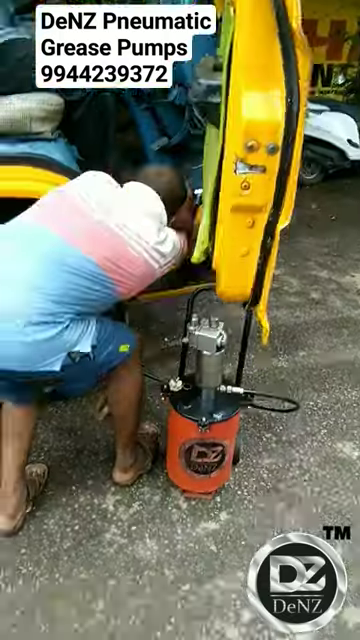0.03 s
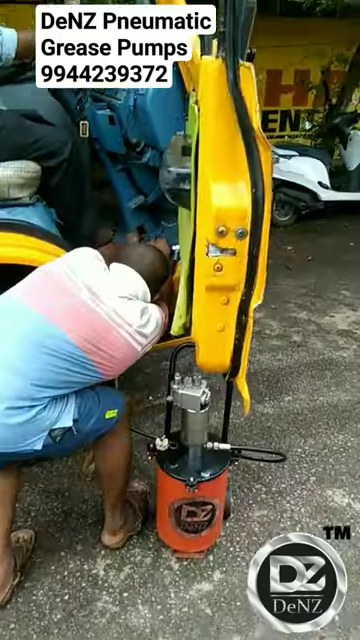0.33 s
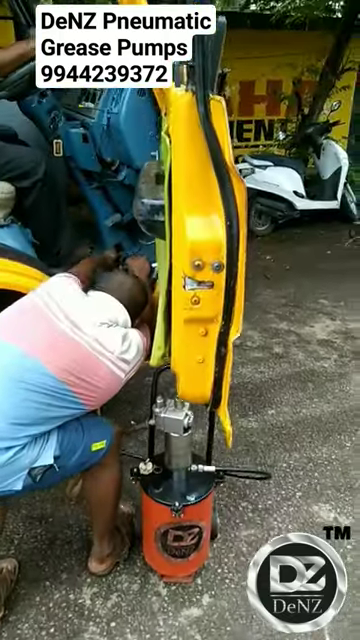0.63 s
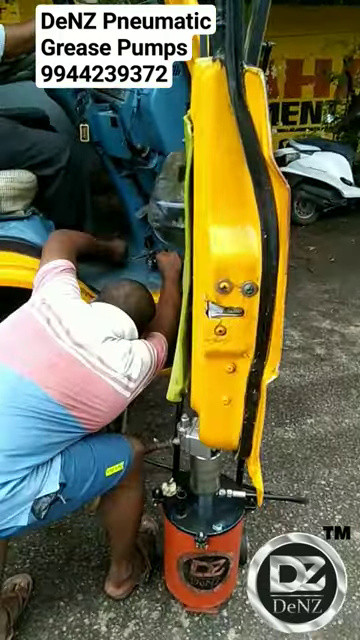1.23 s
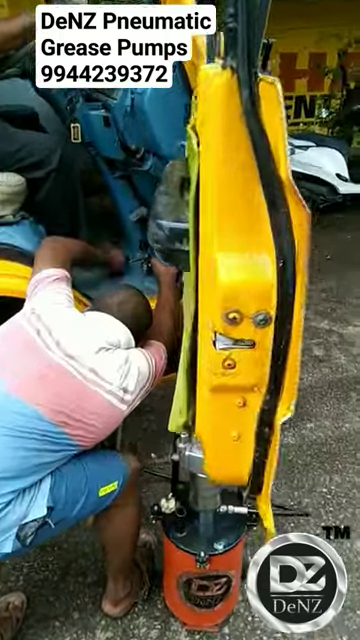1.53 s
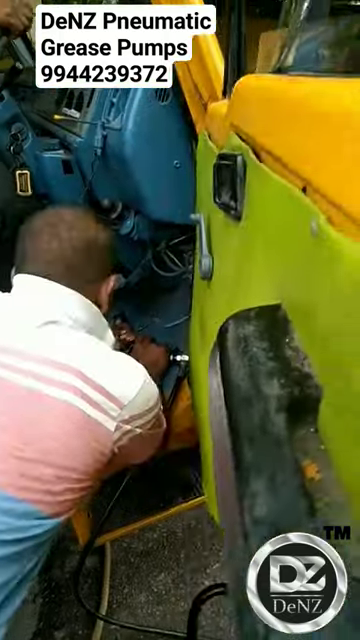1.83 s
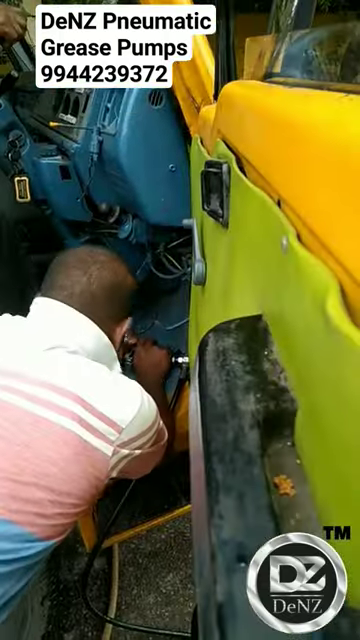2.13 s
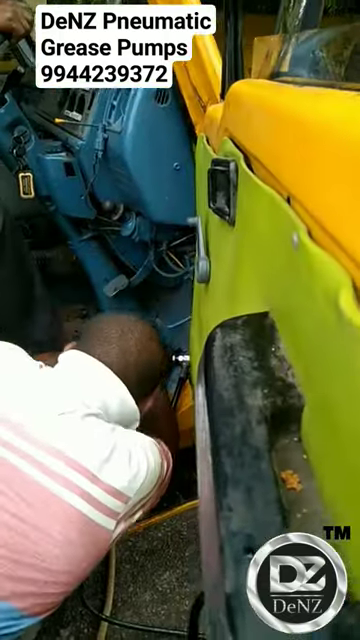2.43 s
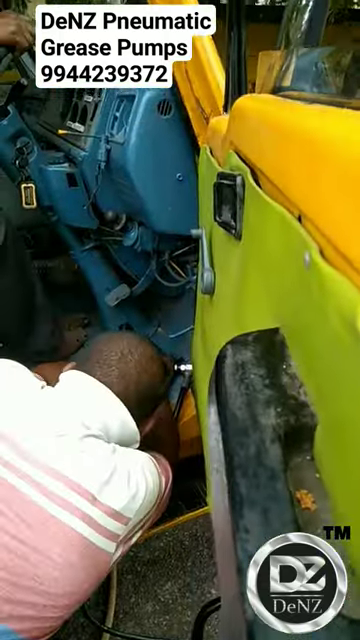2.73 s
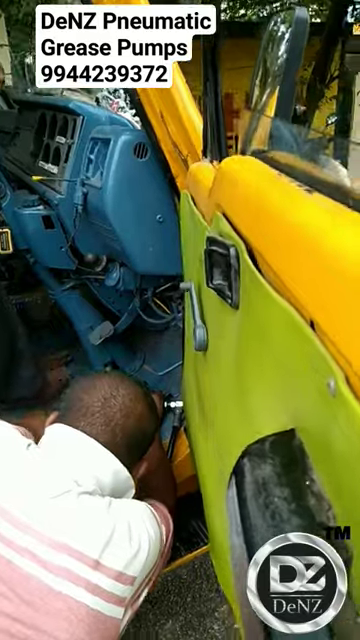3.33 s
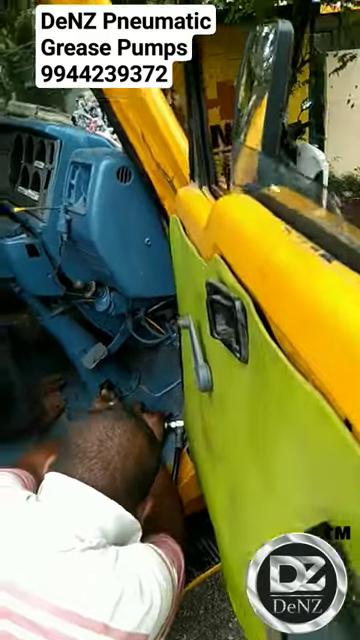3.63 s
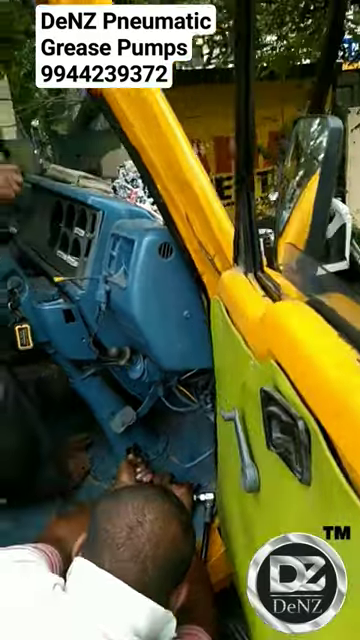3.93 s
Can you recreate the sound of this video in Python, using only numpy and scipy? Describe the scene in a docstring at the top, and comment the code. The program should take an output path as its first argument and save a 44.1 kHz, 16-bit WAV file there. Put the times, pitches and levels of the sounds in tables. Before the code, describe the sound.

An air-driven grease pump hisses in repeated whistling bursts after a low traffic rumble.

```python
"""An air-driven grease pump works beside a truck on a road. Each cycle dumps air through the
exhaust, which hisses and whistles; the whistles sink as the pressure runs out. The piston knocks
softly at each end of its travel, and the sound echoes off door and road.
Before the pump starts at 1.75 s, traffic rumbles with a thin whine, two clicks and a short
rustle are heard, and the sound drops out twice."""
import sys
import numpy as np
from scipy import signal
from scipy.fft import rfft, irfft
from scipy.io import wavfile

SR = 44100
rng = np.random.default_rng(int(sys.argv[2]) if len(sys.argv) > 2 else 0)


def generate_wav(sig):
    """Save sig (samples, or channels by samples) to the path in sys.argv[1] as 16-bit PCM at SR."""
    pcm = np.round(np.clip(np.atleast_2d(sig).T, -1, 1) * 32767).astype(np.int16)
    wavfile.write(sys.argv[1], SR, pcm)


N = 176400
T = np.arange(N) / SR


def amp(db):
    """Turns decibels into a gain."""
    return 10 ** (np.asarray(db) / 20)


def unit(x):
    """Scales a signal to an average (rms) size of 1."""
    return x / np.sqrt(np.mean(x ** 2) + 1e-20)


def noise(points):
    """Noise shaped by rows of pitch in Hz and relative level in dB."""
    hz, db = np.transpose(points)
    shape = np.interp(np.log(np.fft.rfftfreq(N, 1 / SR) + 1), np.log(hz), db)
    return unit(irfft(rfft(rng.standard_normal(N)) * amp(shape), N))


def wander(hz):
    """A random wobble, mostly slower than hz."""
    keep_slow = 1 / (1 + (np.fft.rfftfreq(N, 1 / SR) / hz) ** 4)
    return unit(irfft(rfft(rng.standard_normal(N)) * keep_slow, N))


def whistle(hz, width_hz):
    """A breathy tone: a narrow band of noise around a pitch that may move."""
    r = np.exp(-np.pi * width_hz / SR)
    white = rng.standard_normal(N) + 1j * rng.standard_normal(N)
    slow = signal.lfilter([1], [1, -2 * r, r * r], white)
    phase = 2 * np.pi * np.cumsum(hz * np.ones(N)) / SR
    return unit((slow * np.exp(1j * phase)).real)


def level(points):
    """A gain that follows rows of time in seconds and level in dB."""
    return amp(np.interp(T, *np.transpose(points)))


TOP_HZ, WHISTLE_WIDTH_HZ = 15460, 680  # the high whistle: pitch at full pressure, and width
# Pump cycles. Each row: start in seconds, opening time in seconds, hiss, fizz and port ring levels
# in relative dB, ring pitch in Hz, the low whistle's starting pitch in Hz and level in dB, time in
# seconds when the pressure starts to run out, fall of the high whistle in Hz per second.
CYCLES = [(1.754, 0.0077, -0.5, 0.5, -32, 4960, 6030, -48, 1.827, 32000),
          (1.972, 0.0021, -0.5, 0.5, -27.5, 4990, 6300, -27.5, 2.24, 57600),
          (2.343, 0.0056, -1, -1, -26, 4930, 6230, -29, 2.555, 41100),
          (2.712, .005, 0, -1, -26.5, 4930, 6140, -30, 2.935, 71700),
          (3.185, 0.0037, 0, 1.5, -32, 4890, 7070, -21.5, 3.413, 57100),
          (3.759, 0.018, 1, 3, -26, 4750, 6830, -21, 3.994, 50000)]


def exhaust():
    """Each cycle lets out a jet of air, which slows and fades as the pressure runs out."""
    rows = np.array(CYCLES)
    now = np.maximum(np.searchsorted(rows[:, 0], T) - 1, 0)
    start, opening, hiss_db, fizz_db, ring_db, ring_hz, low_hz, low_db, runs_out, fall = rows[now].T
    age = np.maximum(T - start, 0)
    valve = np.clip(age / opening, 0, 1)
    falling_s = 0.02 * np.logaddexp(0, (T - runs_out) / 0.02)  # eases into the fall
    high_hz = np.maximum(TOP_HZ - fall * falling_s, 1)
    speed = high_hz / TOP_HZ
    closing = 1 / (1 + (3270 / high_hz) ** 4)  # the hiss shuts off as the whistle sinks past 3270 Hz
    flow = closing * amp(-10 * age + 0.74 * wander(hz=60))  # sags and flutters
    rush = rushing_air(speed, hiss_db, fizz_db, ring_db, ring_hz)
    high = high_whistle(high_hz)
    low = amp(low_db - 41 * age) * speed ** 2 * whistle(low_hz - 7500 * age, width_hz=850)
    return valve * (flow * rush + high + low)


# The jet's hiss and its brighter fizz. Each row: pitch in Hz, relative level in dB.
HISS = [(300, -26), (1000, -25), (1800, -19.5), (2500, -11.5), (3100, -9.5), (3600, -2.5), (4500, 0.5),
        (5200, 0), (5900, -6), (7000, -9.5), (9000, -14.5), (16000, -33)]
FIZZ = [(3000, -32.5), (7000, -11.5), (8500, -6.5), (9700, -5), (10500, -1.5), (11900, 2), (12800, -4.5),
        (14000, -15.5), (15500, -16.5)]
# Weaker rings of the exhaust port. Each row: pitch in Hz, width in Hz, level in dB at full flow.
PORT_RINGS = [(3623, 160, -39.5), (4004, 110, -41.5), (4270, 160, -36), (5260, 84, -36)]


def rushing_air(speed, hiss_db, fizz_db, ring_db, ring_hz):
    """The jet hisses and makes the port ring; as it slows, the fizz fades first."""
    port = amp(ring_db) * whistle(ring_hz, width_hz=180)
    port += sum(amp(db) * whistle(hz, width) for hz, width, db in PORT_RINGS)
    hiss = amp(hiss_db - 22) * noise(HISS)
    fizz = amp(fizz_db - 27.5) * noise(FIZZ)
    return (hiss + port) * speed ** 0.81 + fizz * speed ** 1.4


def high_whistle(hz):
    """Starts faint, grows as it sinks, sputters, and stalls when the jet gets too slow."""
    loudest_hz, stall_hz, sputter_hz = 11500, 4160, 70.2
    faint = np.clip((hz - loudest_hz) / (TOP_HZ - loudest_hz), 0, 1)
    strength = np.minimum(hz / loudest_hz, 1) ** 0.96 / (1 + (stall_hz / hz) ** 10)
    sputter = amp(-28.5 - 18.5 * faint ** 2 + 3 * wander(sputter_hz))
    shaky_hz = hz * (1 + 0.014 * wander(sputter_hz))
    return strength * sputter * whistle(shaky_hz, WHISTLE_WIDTH_HZ)


# Air chirps. Each row: middle in seconds, pitch there in Hz, level in dB.
CHIRPS = [(2.865, 14500, -38), (3.36, 12700, -34), (3.974, 12020, -27)]


def chirps(swell_s=0.029, fall_hz_per_s=45000):
    """The jet briefly whistles downward before the piston turns."""
    out = np.zeros(N)
    for middle, hz, db in CHIRPS:
        since = np.clip(T - middle, -5 * swell_s, 5 * swell_s)
        swell = amp(db) * np.exp(-(since / swell_s) ** 2)
        out += swell * whistle(hz - fall_hz_per_s * since, WHISTLE_WIDTH_HZ)
    return out


# Piston knocks. Each row: start in seconds, relative level in dB.
KNOCKS = [(1.972, -31), (2.146, -30.5), (2.342, -34), (2.512, -30), (2.709, -33), (2.878, -31),
          (3.186, -30.5), (3.377, -31), (3.774, -29.5), (3.976, -34.5)]


def knocks(pitch_hz=330, decay_s=0.0012):
    """The piston turns around with a short, dull knock, never twice quite alike."""
    out = np.zeros(N)
    for start, db in KNOCKS:
        age = np.maximum(T - start, 0)
        hz = pitch_hz * (1 + 0.06 * rng.standard_normal())
        pulse = 2 * (age / decay_s) ** 2 * np.exp(-age / decay_s)
        out += amp(db + 0.5) * pulse * np.sin(2 * np.pi * (hz * age + rng.random()))
    return out


def echoes(x, fade_s, count):
    """Scattered echoes that die away by 60 dB in fade_s."""
    taps = np.zeros(SR // 2)
    delays = rng.uniform(.001, fade_s, count)
    taps[(delays * SR).astype(int)] = rng.choice([-1., 1.], count) * amp(-60 * delays / fade_s)
    return signal.fftconvolve(x, taps / np.linalg.norm(taps))[:N]


# Seeping air. Each row: pitch in Hz, relative level in dB.
LEAK = [(2400, -24), (3600, -15), (4300, -7), (4800, -1.5), (5300, -7), (7000, -28), (9300, -35),
        (10200, -20), (12000, -27), (16000, -39)]


def leak():
    """Air seeps from the pump with a faint hiss, heard between cycles."""
    return amp(-46.5) * noise(LEAK)


# Handling clicks. Each row: start in seconds, relative level in dB.
CLICKS = [(0.3422, -27), (0.4593, -16)]
# The tones in a click. Each row: pitch in Hz, relative level in dB, decay time in seconds.
CLICK_TONES = [(550, -3.5, .0007), (1900, 0, 0.00023), (4700, -2.5, 0.00027), (5650, -3.5, 0.00041),
               (8900, -17.5, .0003)]


def clicks():
    """Handling makes two dry clicks, each a few tones that die at once."""
    out = np.zeros(N)
    for start, db in CLICKS:
        age = np.maximum(T - start, 0)
        for hz, tone_db, decay_s in CLICK_TONES:
            pulse = age / decay_s * np.exp(1 - age / decay_s)
            out += amp(db + tone_db) * pulse * np.sin(2 * np.pi * (hz * age + rng.random()))
    return out


# Handling rustle. Each row: pitch in Hz, relative level in dB.
RUSTLE = [(5000, -25), (8300, 5), (10000, -3), (12500, -11), (15500, -20)]


def rustle(middle_s=0.6, half_length_s=0.035):
    """Handling makes one short, grainy burst of bright noise."""
    grains = unit(noise(RUSTLE) * amp(4 * wander(hz=200)))
    return amp(-47) * grains / (1 + ((T - middle_s) / half_length_s) ** 4)


# Traffic before and after the first dropout, and a low swell. Each row: pitch in Hz, relative dB.
FIRST_RUMBLE = [(24, -40), (40, -12), (80, -0.5), (173, -11.5), (257, -12), (392, -12.5), (454, -11),
                (804, -21.5), (1230, -17.5), (2060, -22.5), (3470, -23), (5430, -33.5), (7870, -34),
                (15000, -76)]
RUMBLE = [(25, -21), (48, -15), (66, -1), (100, -1.5), (120, -3.5), (155, -2.5), (240, -5), (390, -5.5),
          (580, -13), (1000, -13), (1250, -12.5), (1550, -14), (2050, -12.5), (3000, -23.5), (4300, -23),
          (5600, -27), (7000, -35), (9600, -45.5), (11500, -63), (15000, -70)]
SWELL = [(40, -25), (75, -5), (150, 2), (220, -11), (1000, -45), (8000, -80)]
# How loud the two rumbles are. Each row: time in seconds, relative level in dB.
FIRST_LEVEL = [(0, -33), (.105, -32.5), (.12, -39.5), (.128, -92)]
RUMBLE_LEVEL = [(.22, -93), (.232, -49.5), (.28, -43.5), (.35, -36.5), (.46, -31), (.57, -30), (1.2, -30.5),
                (1.715, -32.5), (1.728, -62), (1.735, -91)]
# Engine hums and whines. Each row: pitch in Hz, width in Hz, level in dB against the rumble.
ENGINE_TONES = [(65.9, 6.3, -13), (79, 3.3, -14.5), (374, 58, -17), (1255, 53, -15.5), (1947, 65, -10),
                (4040, 100, -21.5)]


def traffic():
    """Engines rumble with wavering tones, drop out, fade back in and drop out again."""
    tones = sum(amp(db) * whistle(hz, width) for hz, width, db in ENGINE_TONES)
    throb = amp(1.23 * wander(hz=40))
    swell = amp(-32) * np.exp(-((T - 0.565) / 0.042) ** 2) * noise(SWELL)
    first = level(FIRST_LEVEL) * noise(FIRST_RUMBLE)
    return swell + first + level(RUMBLE_LEVEL) * throb * (noise(RUMBLE) + tones)


# The street behind the pump. Each row: pitch in Hz, relative level in dB.
STREET = [(25, -30), (48, -25), (66, 4), (110, -4.5), (220, -1), (400, -11), (650, -12), (1000, -16),
          (1600, -17), (3000, -21), (8000, -36), (16000, -48)]


def street():
    """The street gives a quiet, steady rumble."""
    return amp(-49.5) * noise(STREET)


def scene():
    """Traffic comes first, then the pump with its echoes."""
    air = exhaust() + chirps()
    pump = air + knocks()
    near = amp(-5.5) * echoes(air, fade_s=0.08, count=80)  # off door and road
    far = amp(-21) * echoes(pump, fade_s=0.35, count=800)  # along the street
    fade_in = np.clip((T - 1.751) / 0.0057, 0, 1)  # ends the second dropout
    background = fade_in * (street() + leak())
    return (pump + near + far + background + traffic() + rustle() + clicks())[None]


def record(dry):
    """Cuts the treble above 15550 Hz."""
    lowpass = signal.firwin(511, 15550, window=("kaiser", 9), fs=SR)
    return signal.oaconvolve(dry, lowpass[None], "same")


dry = scene()
out = record(dry)
generate_wav(out)
```